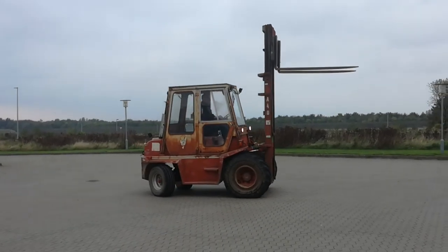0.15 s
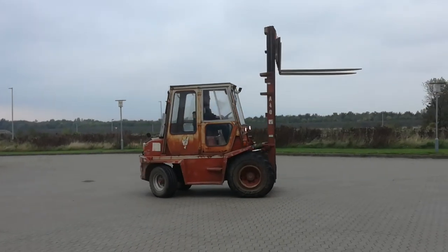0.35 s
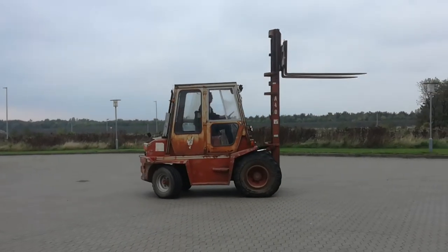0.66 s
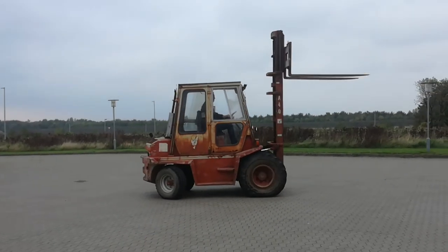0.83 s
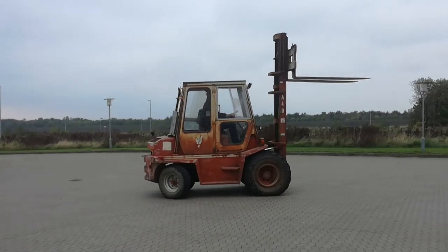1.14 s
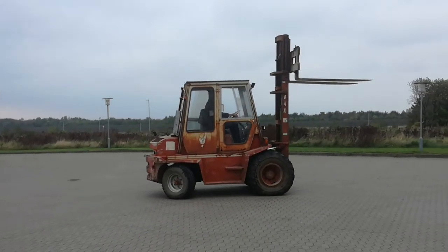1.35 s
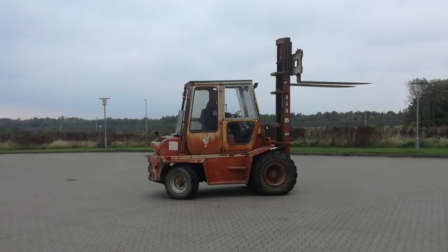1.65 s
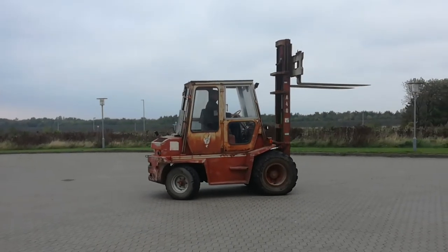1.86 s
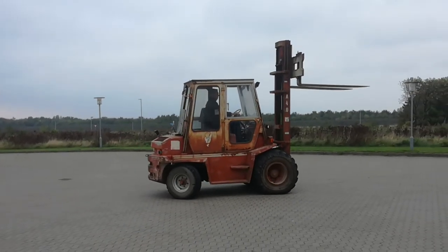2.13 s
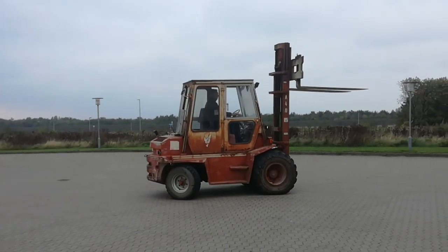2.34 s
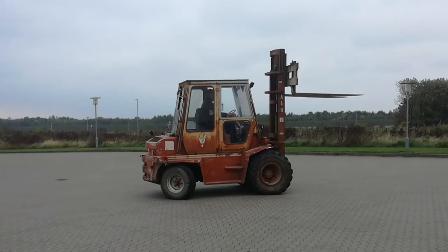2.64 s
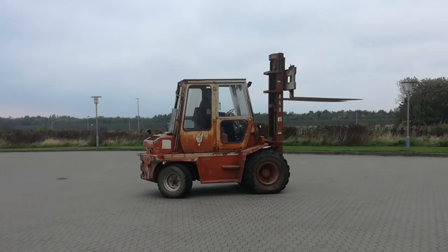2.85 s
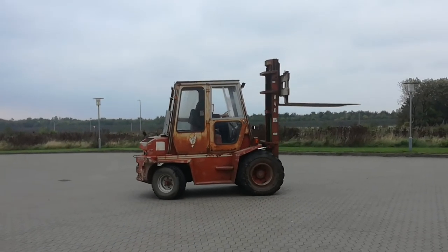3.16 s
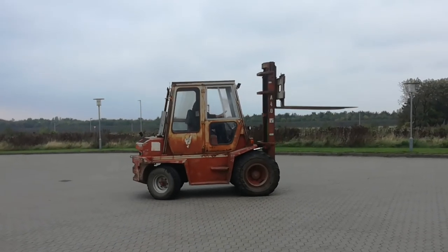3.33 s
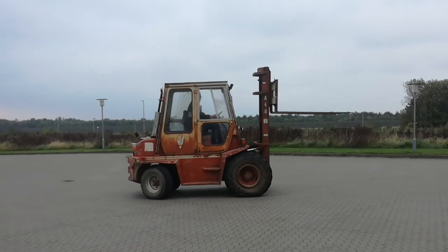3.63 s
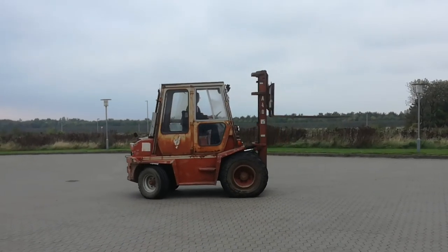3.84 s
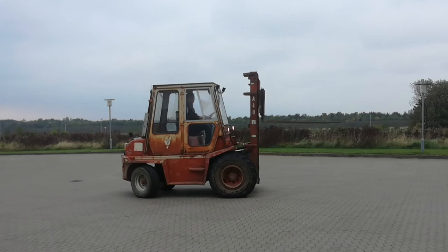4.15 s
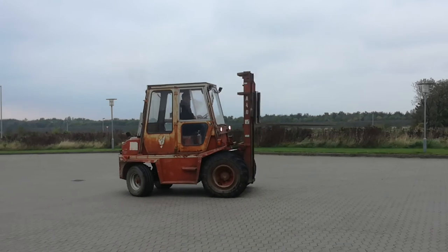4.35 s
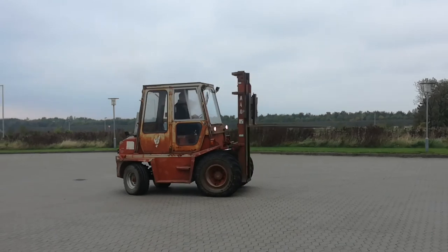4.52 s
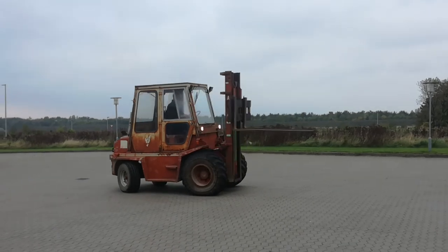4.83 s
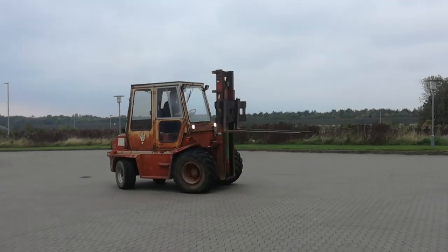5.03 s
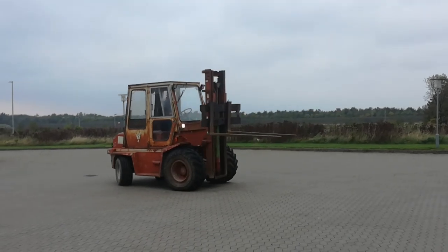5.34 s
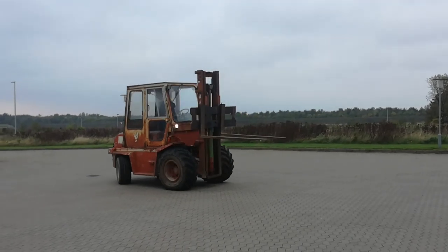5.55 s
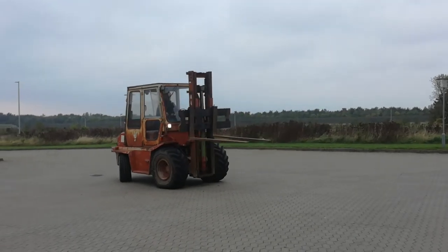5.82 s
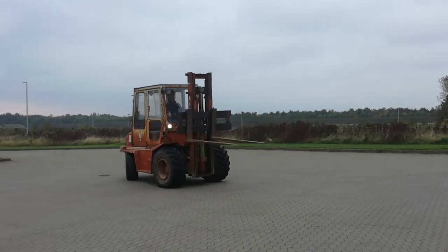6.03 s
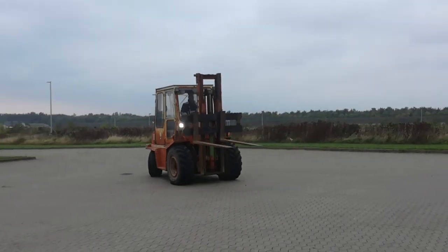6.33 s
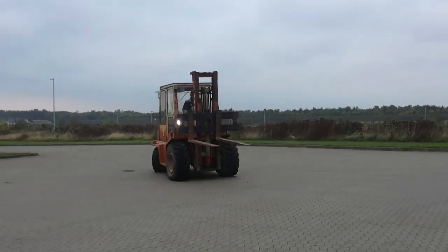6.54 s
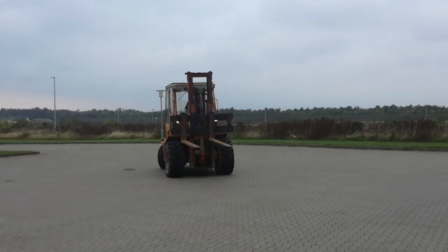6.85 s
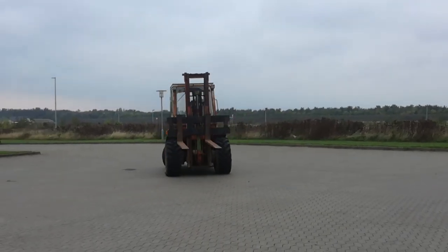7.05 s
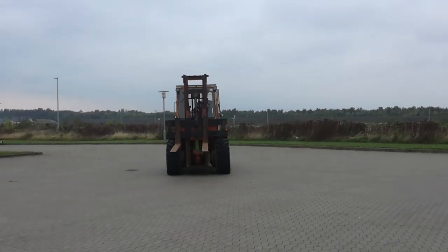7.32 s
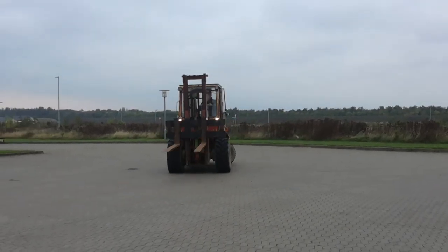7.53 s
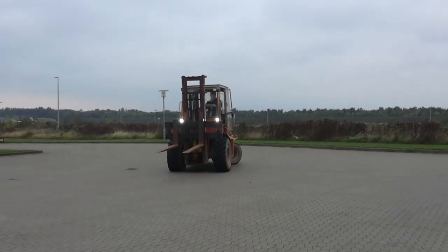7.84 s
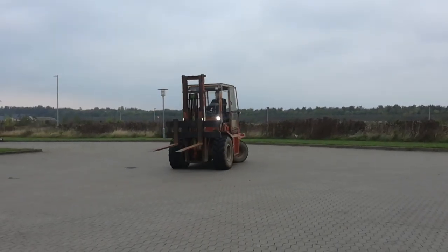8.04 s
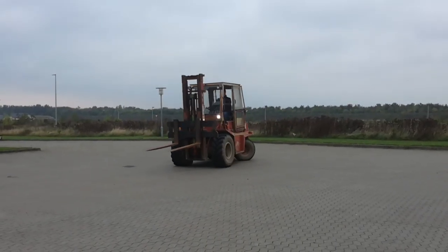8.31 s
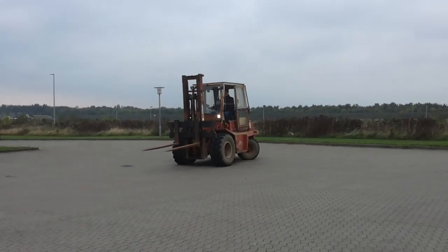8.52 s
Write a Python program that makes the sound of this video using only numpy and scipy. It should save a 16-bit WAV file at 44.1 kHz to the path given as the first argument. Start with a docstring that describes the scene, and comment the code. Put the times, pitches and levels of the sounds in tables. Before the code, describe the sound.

Steady knocking diesel idle in open air, heard in stereo from some metres away. Gritty hydraulic spurts and steel ticks over a faint pump whine give way to roaring, hissing oil through a valve, with a high squeal. After a sharp metallic clunk the engine lifts briefly, then settles while the machine turns, with faint tyre grit, a tiny squeak and low breeze rumble.

```python
"""A diesel forklift idles across an open paved lot, lowers its forks and turns to face the microphone.
Each firing gives an exhaust puff, as a stack of tones, and a knock in the block, as a noise burst.
The hydraulic pump whines at first, then fades to a trace; oil spurts in bursts of noise as the chain ticks.
Oil then rushes and squeals through the lowering valve, the mast clunks in decaying modes, and the engine
picks up. Grit hisses under the tyres and a light breeze rumbles behind it all."""
import sys
import numpy as np
from scipy import signal
from scipy.fft import rfft, irfft, next_fast_len
from scipy.io import wavfile
from scipy.ndimage import uniform_filter1d, map_coordinates

SR = 44100
rng = np.random.default_rng(int(sys.argv[2]) if len(sys.argv) > 2 else 0)


def generate_wav(signal):
    """Clip the signal to [-1, 1] and save it as 16-bit WAV at the path in sys.argv[1]."""
    frames = np.transpose(np.atleast_2d(signal))
    scaled = np.clip(frames, -1, 1) * 32767
    pcm = np.round(scaled).astype(np.int16)
    wavfile.write(sys.argv[1], SR, pcm)


N = 382769
TIME = np.arange(N) / SR

# Engine speed. Each row: time in seconds, firings per second.
ENGINE_SPEED = [(0.0, 31.222), (0.139, 30.44), (0.363, 32.273), (1.171, 31.002), (1.939, 30.967),
                (2.208, 28.326), (2.616, 30.415), (3.751, 31.212), (4.111, 37.107), (4.37, 35.153),
                (4.797, 35.429), (5.104, 33.867), (6.002, 32.395), (6.441, 32.724), (7.367, 32.638),
                (8.68, 33.744)]
# Strength of each cylinder's knock, in firing order, in dB.
CYLINDERS_DB = [2.2, 2.8, 3.0, 0]
# Spectrum of an oil spurt, which also colours the chain. Each row: frequency in Hz, level in dB.
SPURT_SPECTRUM = [(200, -24), (450, -6), (800, -3), (1100, 1), (1450, 0), (2000, -6), (2600, -15),
                  (3200, -11), (3800, -10.5), (4750, -7.5), (5600, -19.5), (8000, -22.5), (9000, -35),
                  (14000, -39), (15400, -34)]
# Resonances of the oil pipes. Each row: frequency in Hz, width in Hz, lift in dB.
PIPE_MODES = [(4050, 50, 6), (4222, 30, 3), (4425, 60, 3), (4680, 20, 6), (5012, 16, 6), (6501, 10, 4),
              (7830, 14, 5)]


def gain_of(db):
    """Decibels to gain."""
    return 10 ** (np.asarray(db) / 20)


def evened(x):
    """Scales to rms 1; a mid-side pair is scaled by its mid."""
    return x / np.sqrt(np.mean(np.atleast_2d(x)[0] ** 2) + 1e-20)


def follow(rows):
    """Draws straight lines through the rows, one curve per column, holding the end values."""
    s, *columns = np.transpose(rows)
    return [np.interp(TIME, s, c) for c in columns]


def colour(x, points):
    """Filters by a spectrum of (Hz, dB) points."""
    size = next_fast_len(N, True)
    hz, db = np.transpose(points)
    bins_hz = np.fft.rfftfreq(size, 1 / SR)
    gain = gain_of(np.interp(np.log(bins_hz + 1), np.log(hz), db))
    return irfft(rfft(x, size) * gain, size)[..., :N]


def add(mix, s, sound):
    """Adds a sound into the channels of mix at time s."""
    part = mix[:, max(round(s * SR), 0):][:, :sound.shape[-1]]
    part += sound[..., :part.shape[1]]


def wander(rate):
    """Random curve of rms 1 with `rate` knots per second; it holds still once 4096 knots are spent."""
    knots = rng.standard_normal(4096)
    return evened(np.interp(TIME * rate, np.arange(len(knots)), knots))


def crackle(spread_db, rate):
    """Mid and side noise whose strength wanders, within bounds, from instant to instant."""
    strength = gain_of(spread_db * np.tanh(wander(rate)))
    return evened(rng.standard_normal((2, N)) * strength)


def resonate(x, hz, width):
    """Shifts hz down to zero, smooths, and shifts back: a resonance of gain 1 that can move."""
    turn = np.exp(2j * np.pi * np.cumsum(hz * np.ones(N)) / SR)
    r = np.exp(-np.pi * abs(width) / SR)
    return 2 * (turn * signal.lfilter([1 - r], [1, -r], x / turn)).real


def ringing(x, modes):
    """Lifts narrow resonances out of a sound, from rows of (Hz, width Hz, dB)."""
    lifts = [(gain_of(db) - 1) * signal.lfilter(*signal.iirpeak(hz, hz / width, SR), x)
             for hz, width, db in modes]
    return x + sum(lifts)


def churn(x, depth_db, patch_hz=260, patch_s=.035):
    """Patches of the spectrum swell and sink at random."""
    hz, s, z = signal.stft(x, SR, nperseg=512, noverlap=384)
    field = rng.standard_normal((256, 512))
    where = np.meshgrid(hz / patch_hz, s / patch_s, indexing="ij")
    patches = map_coordinates(field, where, order=1, mode="wrap")
    churned = signal.istft(z * gain_of(depth_db * patches), SR, nperseg=512, noverlap=384)[1]
    return evened(churned[:, :N])


def steel(x, t60, share):
    """The treble also passes through steelwork with dense, short-lived modes."""
    t = np.arange(4096) / SR
    ring = rng.standard_normal((2, len(t))) * 1000 ** (-t / t60)
    ring /= np.linalg.norm(ring, axis=1, keepdims=True)
    ring = signal.sosfilt(signal.butter(2, 2200, "high", fs=SR, output="sos"), ring)
    return evened(x + share * signal.oaconvolve(x, ring, axes=1)[:, :N])


def spread(mid, side):
    """The side is part phase shift between the ports, part scattered sound; each port favours its own bands."""
    # Between the two microphone ports. Each row: frequency in Hz, side against mid in dB,
    # share of the side that is a quarter cycle ahead, -1 to 1.
    port_width = [(60, -15, 0.21), (140, -16.5, -0.45), (260, -12, -0.18), (388, 1.5, -0.96),
                  (604, -9.5, -0.55), (890, 5, -0.57), (1120, -9, 1), (1340, -4, -0.7), (1620, -3, 0.42),
                  (1850, -8, 0.52), (2280, 0, 0.29), (2920, 2.5, -0.38), (4700, -0.5, -0.77),
                  (15000, 0, -0.077)]
    # Lean of the microphone. Each row: frequency in Hz, left against right in dB.
    port_lean = [(200, 0), (320, .5), (480, -2.5), (690, 3), (960, -5), (1450, 2.5), (1640, -1), (2000, 8),
                 (2400, 8.5), (3200, -3.5), (4200, -2), (5600, -7.5), (6700, -4.5), (8000, -9), (13500, 5),
                 (15500, 3)]
    size = next_fast_len(N, True)
    hz, db, ahead = np.transpose(port_width)
    bins_hz = np.fft.rfftfreq(size, 1 / SR)
    ahead = np.clip(np.interp(np.log(bins_hz + 1), np.log(hz), ahead), -1, 1)
    shifted = 1j * ahead * rfft(mid, size)
    scattered = np.sqrt(1 - ahead ** 2) * rfft(side, size)
    side = colour(irfft(shifted + scattered, size)[:N], np.transpose([hz, db]))
    # the two ports' powers add up to the same total in every band
    left, right = [[(f, 10 * np.log10(2 / (1 + gain_of(-sign * lean) ** 2))) for f, lean in port_lean]
                   for sign in (1, -1)]
    return np.array([colour(mid + side, left), colour(mid - side, right)])


def placed(pair, left_db):
    """Leans a left-right pair to one side: left against right in dB."""
    return pair * gain_of([[left_db / 2], [-left_db / 2]])


def air(gust_db=3):
    """A light breeze rumbles under faint open-air hiss, as coloured noise with slow gusts."""
    # Breeze and distance. Each row: frequency in Hz, relative level in dB per Hz.
    air_spectrum = [(15, -51), (35, 4.5), (70, 6.5), (100, 2), (150, 0), (400, -11.5), (2000, -5.5),
                    (8000, -44.5), (15000, -40)]
    # Strength of the breeze before gusts. Each row: time in seconds, level in dB.
    breeze = [(0, -45.5), (2, -46), (4.5, -43), (6.2, -44.5), (7.2, -47.5), (8.68, -45.5)]
    gusts = gust_db * np.tanh(wander(3.08))
    return evened(colour(rng.standard_normal((2, N)), air_spectrum)) * gain_of(follow(breeze)[0] + gusts)


def squeak(width_hz=1000):
    """A brief squeak that sags in pitch: a tone made fuzzy by low-passed noise."""
    # Each row: time in seconds, frequency in Hz, level in dB.
    squeak_path = [(7.806, 5040, -50), (7.82, 4720, -40), (7.832, 4300, -45), (7.85, 4140, -49)]
    hz, db = follow(squeak_path)
    lowpass = signal.butter(2, width_hz, fs=SR, output="sos")
    fuzz = evened(signal.sosfilt(lowpass, rng.standard_normal((2, N))))
    sounding = (TIME > squeak_path[0][0]) & (TIME < squeak_path[-1][0])
    return np.sqrt(2) * sounding * gain_of(db) * fuzz * np.cos(2 * np.pi * np.cumsum(hz) / SR)


def tyres(spread_db=7):
    """Grit hisses under the turning tyres as uneven noise; a few grains crack as sudden swells of it."""
    # Tyres scrubbing grit on the pavers in the turn. Each row: time in seconds, level in dB.
    scrub = [(3.6, -72), (4.5, -60.5), (6.6, -57), (7.1, -62.5), (8.68, -64.5)]
    # Spectrum of the grit. Each row: frequency in Hz, relative level in dB per Hz.
    grit = [(1500, -32), (3000, -3), (5500, -2), (6700, -13), (8000, -3.5), (9500, -18.5), (14000, -16.5)]
    # Single grains that crack under a tyre. Each row: start in seconds, level in dB added to the scrub.
    cracks = [(4.55, -52), (6.82, -50.5), (7.16, -56)]
    level = gain_of(follow(scrub)[0])
    decay = np.exp(-np.arange(2000) / SR / 0.0086)
    for s, db in cracks:
        add(level[None], s, gain_of(db) * decay)
    return level * evened(colour(crackle(spread_db, rate=410), grit))


def thuds(half_cycles=0.55):
    """The machine rocks on its tyres, which take the weight with a few low swings under a bell envelope."""
    # Each row: middle in seconds, level in dB, frequency in Hz.
    thud_rows = [(1.003, -32, 75), (5.22, -41, 31.9), (5.56, -35, 73), (5.875, -36, 47.7)]
    out = np.zeros(N)
    for s, db, hz in thud_rows:
        cycles = (TIME - s) * hz
        bell = np.exp(-(cycles / half_cycles) ** 2)
        out += np.sqrt(2) * gain_of(db) * bell * np.cos(2 * np.pi * cycles)
    return out


def clunks(rattle=0.54):
    """Blows, then rattling contacts, ring the mast; soft blows reach its low modes, hard ones the high."""
    # Clunks of mast and carriage. Each row: start in seconds, loudest short-term level in dB,
    # contact time in seconds, brightness in Hz.
    blows = [(.970, -34, .003, 210), (.986, -32.5, .003, 190), (1.37, -42, .02, 160),
             (2.256, -28, .005, 560), (2.277, -28, .005, 140), (2.308, -33, .007, 170),
             (2.385, -36, .012, 180), (2.42, -34, .014, 180), (3.807, -28.5, .005, 2400),
             (3.815, -23, .004, 800), (3.843, -32.5, .008, 360), (3.876, -34, .007, 190),
             (3.903, -35, .006, 1300), (3.952, -40, .012, 500), (4.44, -39, .014, 170),
             (4.857, -38, .006, 2400)]
    # What the mast rings with. Each row: frequency in Hz, level in dB, 60 dB decay time in seconds.
    mast_modes = [(118, 0, .13), (165, 2, .14), (225, 0, .13), (285, -1, .13), (335, -4, .1), (462, 1, .08),
                  (518, 6, .08), (640, -4, .05), (800, 3, .04), (930, -1, .03), (1250, 7, .03),
                  (1400, 4, .03), (1780, 9, .04), (2300, 6, .025)]
    out, t = np.zeros((2, N)), np.arange(12000) / SR
    for s, db, contact, bright_hz in blows:
        lowest_hz = bright_hz / 3
        ring = np.zeros((2, len(t)))
        for hz, mode_db, t60 in mast_modes:
            reach = (1 + (hz / bright_hz) ** 4 + (lowest_hz / hz) ** 4) ** .5
            swing = np.sin(2 * np.pi * (hz * t + rng.random((2, 1))))
            ring += gain_of(mode_db) * 1000 ** (-t / t60) * swing / reach
        ring = ring * np.minimum(t / .001, 1)
        solid = evened(ring * (1 - np.exp(-t / contact)))
        contacts = rng.standard_normal((2, len(t))) * (t / contact) * np.exp(-t / contact)
        rattling = evened(signal.fftconvolve(contacts, ring, axes=1)[:, :len(t)])
        sound = solid + rattle * rattling
        loudest = np.sqrt(uniform_filter1d(sound ** 2, size=900).max(axis=1, keepdims=True))
        add(out, s, gain_of(db) * sound / loudest)
    return out


def ticks(level_db=3, tail_db=-6, tail_s=.008):
    """Each chain link lands with a crack and a short, dense steel ring, a little brighter than the spurts."""
    # Lift chain against the mast. Each row: start in seconds, level in dB before level_db is added.
    tick_rows = [(0.0423, -39), (0.0687, -31), (0.2423, -27), (0.2844, -32), (0.3731, -25), (0.4623, -26),
                 (0.5357, -27), (0.5574, -27), (0.6544, -23), (0.7497, -26), (0.7816, -31), (0.8704, -26),
                 (0.9014, -22), (0.9517, -21), (1.0241, -27), (1.1333, -33), (1.6357, -30), (3.1198, -20),
                 (3.465, -26), (3.6426, -21)]
    out, t = np.zeros((2, N)), np.arange(3000) / SR
    crack_s = .0015
    shape = np.exp(-t / crack_s) + gain_of(tail_db) * np.exp(-t / tail_s)
    for s, db in tick_rows:
        add(out, s, gain_of(db + level_db) * shape * rng.standard_normal((2, len(t))))
    brighter = colour(colour(out, SPURT_SPECTRUM), [(1200, -1.5), (9000, 4)])
    return ringing(brighter, PIPE_MODES)


def spurts(rise=0.0025, level_db=-1.8, ring_share=1.0):
    """Oil spurts as the valve is feathered: short gritty bursts of noise that ring the pipes."""
    # Each row: start in seconds, length in seconds, level in dB before level_db is added.
    spurt_rows = [(0, 0.015, -29), (0.034, 0.052, -31.5), (0.24, 0.11, -31), (0.361, 0.023, -36),
                  (0.46, 0.021, -31.5), (0.534, 0.042, -28.5), (0.59, 0.083, -34.5), (0.642, 0.036, -37.5),
                  (0.691, 0.025, -32), (0.739, 0.026, -34), (0.78, 0.022, -34.5), (0.865, 0.011, -31.5),
                  (0.892, 0.036, -31.5), (0.938, 0.023, -31), (1.012, 0.076, -35.5), (1.113, 0.035, -34.5),
                  (1.628, 0.03, -31), (3.383, 0.018, -32), (3.448, 0.042, -31), (3.565, 0.12, -32.5),
                  (3.71, 0.049, -36), (3.79, 0.025, -38)]
    fall = .008  # seconds
    opening, t = np.zeros(N), np.arange(8192) / SR
    for s, length, db in spurt_rows:
        shape = (1 - np.exp(-t / rise)) * np.exp(-np.maximum(t - length, 0) / fall)
        add(opening[None], s, gain_of(db) * shape)
    jet = steel(crackle(spread_db=6, rate=1300), t60=.05, share=1.3)
    pipes = [(hz, width, db * ring_share) for hz, width, db in PIPE_MODES]
    return gain_of(level_db) * opening * evened(ringing(colour(jet, SPURT_SPECTRUM), pipes))


def squeal(turns, throb_db=4.0, bend_hz=22):
    """The valve squeals as the flow settles: a narrow band of noise that throbs and bends with each firing."""
    # Each row: time in seconds, frequency in Hz before bending, level in dB before trim and throb.
    squeal_path = [(2.6, 4330, -56), (2.74, 4370, -38), (2.98, 4430, -36.5), (3.24, 4510, -36),
                   (3.33, 4470, -40), (3.42, 4450, -60)]
    hz, db = follow(squeal_path)
    hz = hz + bend_hz * np.sin(2 * np.pi * turns) + bend_hz * wander(40)
    width = 170  # Hz
    tone = evened(resonate(resonate(rng.standard_normal((2, N)), hz, width), hz, 2 * width))
    sounding = (TIME > squeal_path[0][0]) & (TIME < squeal_path[-1][0])
    return sounding * tone * gain_of(db - 2.0 + throb_db * np.cos(2 * np.pi * turns))


def lowering(edge=0.015, flicker_db=2.0):
    """Turbulent oil roars through the mast, whistles in the pipes and hisses while the flow is fastest."""
    # Oil flow while the forks sink. Each row: time in seconds, flow in dB near its peak's 0,
    # pitch of the jet in the valve in Hz.
    oil_flow = [(2.179, -9, 4440), (2.33, -7.5, 4350), (2.42, -1, 4500), (2.51, 0.5, 4600), (2.6, -6, 4500),
                (2.76, -7.5, 4170), (2.999, -10.5, 4300), (3.27, -9.5, 4330), (3.43, -18.5, 4160),
                (3.78, -26, 4300)]
    # Spectra of the roar and of the hiss. Each row: frequency in Hz, relative level in dB per Hz.
    roar_spectrum = [(82, -42), (140, -23), (167, -2.5), (210, -28.5), (342, -2.5), (407, -9.5), (484, 2.5),
                     (590, -5.5), (760, -4.5), (907, -2.5), (1120, 2), (1450, 2), (1600, -6), (1860, 2.5),
                     (2190, -8), (2700, -11.5), (3400, -16), (4420, -12), (7480, -120)]
    hiss_spectrum = [(2000, 8.5), (3200, 8.5), (4300, 11), (5200, 14), (5900, 3), (6500, 9), (7200, 1.5),
                     (7900, 5.5), (8800, -17), (11000, -9), (14000, -19), (15400, -14)]
    roar_db, whistle_db, hiss_db = -28.5, -32.5, -32.5  # at flow 0 dB, before body and flicker
    roar_law, whistle_law = 0.37, 0.5  # dB per dB of flow; the hiss follows it one to one
    choke_db, choke_law = -6, 0.23  # below this flow the whistle dies away faster, by this many dB per dB
    body_hz, body_db, body_db_per_s = 850, -1, 6.5  # the low part of the roar swells as the carriage sinks
    hollow_hz, hollow_hz_per_s = 1010, 190  # a resonance of the mast climbs as it shortens
    hollow_width_hz, hollow_db = 110, -11
    shut_s = 0.1  # the flow dies away at the end of travel
    start, end = oil_flow[0][0], oil_flow[-1][0]
    flow, jet_hz = follow(oil_flow)
    sinking_s = np.clip(TIME, start, end) - start

    jet = steel(crackle(spread_db=1.0, rate=450), t60=0.031, share=1.0)
    swirl, width = crackle(spread_db=2.5, rate=130), 520  # width in Hz
    whistle = resonate(resonate(swirl, jet_hz, width), jet_hz, width)
    whistle = evened(ringing(whistle, PIPE_MODES))
    choke = choke_law * np.maximum(choke_db - flow, 0)

    roar = churn(colour(jet, roar_spectrum), depth_db=2.8)
    body = colour(roar, [(body_hz, 0), (2 * body_hz, -40)])
    hollow = evened(resonate(roar, hollow_hz + hollow_hz_per_s * sinking_s, hollow_width_hz))
    swell = gain_of(body_db + body_db_per_s * sinking_s) - 1
    roar = evened(roar + gain_of(hollow_db) * hollow) + swell * body
    hiss = evened(ringing(colour(jet, hiss_spectrum), PIPE_MODES))

    layers = (gain_of(roar_db + roar_law * flow) * roar
              + gain_of(whistle_db + whistle_law * flow - choke) * whistle
              + gain_of(hiss_db + flow) * hiss)
    gate = np.clip((TIME - start) / edge, 0, 1) * np.exp(-np.maximum(TIME - end, 0) / shut_s)
    return gate * gain_of(flicker_db * wander(70)) * layers


def whine(turns):
    """The pump's gears sing one thin tone; each firing jolts the shaft a little."""
    # Each row: time in seconds, frequency in Hz before the jolts, level in dB before wavering.
    whine_path = [(0, 1853, -42), (.22, 1767, -51), (.33, 1876, -46), (.62, 1953, -47), (.85, 2006, -52),
                  (.89, 1943, -38), (1.02, 1970, -55), (1.14, 1910, -42), (1.42, 1918, -39),
                  (1.58, 1936, -41), (1.8, 1906, -46), (1.95, 1906, -44.5), (2.05, 1887, -48),
                  (2.3, 1820, -65)]
    flutter, backlash, waver_db = .35, .25, 1.6  # flutter and backlash in radians
    hz, db = follow(whine_path)
    jolts = flutter * np.sin(2 * np.pi * turns) + backlash * wander(30)
    angle = 2 * np.pi * np.cumsum(hz) / SR + jolts
    return np.sqrt(2) * np.cos(angle) * gain_of(db + waver_db * wander(43.45))


def bracket(turns, hz=3060, width=90):
    """A loose bracket sings: each firing shakes a thin ringing part with a burst of noise."""
    # Each row: time in seconds, level in dB.
    bracket_level = [(4.3, -70), (5.2, -59), (6.4, -56), (6.9, -60.5), (7.3, -62), (7.7, -62), (8.68, -63)]
    shakes = np.exp(-(turns % 1) / 2.0) * rng.standard_normal((2, N))
    sung = resonate(resonate(shakes, hz, width), hz, 3 * width)
    return gain_of(follow(bracket_level)[0]) * evened(sung)


def block(turns):
    """Each firing rings the engine block for a few milliseconds, at a slightly different pitch each time."""
    # Each row: time in seconds, level in dB.
    block_level = [(0, -50), (3.9, -50), (4.5, -47), (6.8, -47), (7.15, -42.5), (7.4, -42), (7.7, -47),
                   (8.68, -50)]
    hz, scatter_hz, scatter_db = 1290, 70, 2
    peaks, length = .52, .14  # in parts of a firing
    firing = turns.astype(int)
    pitch, size = rng.standard_normal((2, firing[-1] + 1))[:, firing]
    strength_db = np.take(CYLINDERS_DB, firing % len(CYLINDERS_DB)) + scatter_db * np.tanh(size)
    stroke = gain_of(strength_db) * np.exp(-((turns % 1 - peaks) / length) ** 2 / 2)
    angle = 2 * np.pi * np.cumsum(hz + scatter_hz * np.tanh(pitch)) / SR
    return gain_of(follow(block_level)[0]) * evened(stroke * np.cos(angle))


def knock(noise, shape):
    """A burst of the given shape that strikes all frequencies about equally hard."""
    flat = irfft(np.exp(1j * np.angle(rfft(noise * shape))))
    return evened(flat * np.minimum(4 * shape / shape.max(), 1))


def clatter(turns, fires=.39, scatter_db=3.1):
    """Every cylinder has its own knock, partly new each time, over the rattle of valves and gears."""
    # Combustion clatter at steady speed. Each row: time in seconds, level in dB.
    clatter_level = [(0, -34), (1.35, -38.5), (2.05, -37.5), (2.3, -30.5), (3.7, -34.5), (4.8, -38),
                     (6.8, -39.5), (7.3, -38), (8.1, -41), (8.68, -41.5)]
    # How the machine faces the microphone. Each row: time in seconds, 0 flank, 1 oblique or 2 front.
    facing_path = [(0, 0.46), (1.2, 0.78), (2.2, 0.23), (4.1, 0.93), (5.6, 1.52), (6.7, 1.88), (8.68, 1.9)]
    # The clatter as it radiates each way. Each row: frequency in Hz, relative level in dB per Hz.
    flank = [(130, 16.5), (220, -41), (400, -31), (650, 0), (880, 1.5), (1150, 4), (1400, 15.5), (1520, -3),
             (1800, 6), (2150, -3.5), (4500, -12.5), (5700, -7.5), (6600, -20), (15000, -38)]
    oblique = [(130, 9), (300, -7), (420, -8.5), (690, 1), (880, -9), (1120, 0), (1380, -1.5), (1500, -7),
               (1780, -0.5), (2450, -4.5), (2800, -10), (3100, -5), (3500, -10), (5300, -17), (9000, -31.5),
               (15000, -39)]
    front = [(130, 6.5), (430, -9.5), (690, 10.5), (870, -9), (1100, 4.5), (1360, 4.5), (1490, -4),
             (1800, -1.5), (2300, 1.5), (2750, -18), (3700, -25), (5200, -13.5), (6800, -25.5),
             (9500, -34.5), (15000, -33)]
    # Panels that the engine sets ringing. Each row: frequency in Hz, width in Hz, lift in dB.
    panels = [(338, 19, 7), (419, 5.5, 12.5), (671, 18, 3), (1021, 17, 6.5), (1124.6, 26, 8.5),
              (1799, 137, 9.5), (3030, 70, 3), (4280, 370, 5), (4960, 220, 2.5)]
    # Each row: frequency in Hz, knock against rattle in dB.
    knock_share = [(150, 1), (400, -4), (700, 1), (1000, 2), (1300, 5), (1700, -1), (2500, 0), (5000, -4),
                   (12000, -7)]
    pull_db = 0.1131  # harder knock while speeding up, dB for each firing per second gained in a second
    rise, decay, fresh = .005, .013, .7  # seconds, seconds, new noise against the cylinder's own

    t = np.arange(2048) / SR
    shape = (1 - np.exp(-t / rise)) * np.exp(-t / decay)
    own = rng.standard_normal((len(CYLINDERS_DB), 2, len(t)))
    rattle = crackle(spread_db=3, rate=420)
    knocks = np.zeros((2, N))
    draws, sizes = rng.standard_normal((320, 2, len(t))), rng.standard_normal(320)
    for k, at in enumerate(np.flatnonzero(np.diff(np.floor(turns - fires)))):
        cylinder = k % len(own)
        strength = gain_of(CYLINDERS_DB[cylinder] + scatter_db * np.tanh(sizes[k]))
        add(knocks, at / SR, strength * knock(own[cylinder] + fresh * draws[k], shape))

    # knock and rattle share each band by the table; together they stay about white
    drive = colour(evened(knocks), knock_share) + rattle
    drive = colour(drive, [(hz, -10 * np.log10(gain_of(db) ** 2 + 1)) for hz, db in knock_share])
    drive = signal.sosfilt(signal.butter(4, 150, "high", fs=SR, output="sos"), drive)
    drive = churn(ringing(drive, panels), depth_db=2.05)

    facing = np.clip(follow(facing_path)[0], 0, 2)
    radiated = np.zeros((2, N))
    for k, way in enumerate([flank, oblique, front]):
        radiated += np.maximum(1 - abs(facing - k), 0) * evened(colour(drive, way))
    speeding_up = np.maximum(np.gradient(follow(ENGINE_SPEED)[0]) * SR, 0)
    pull = uniform_filter1d(speeding_up, size=6000)
    return radiated * gain_of(follow(clatter_level)[0] + pull_db * pull)


def exhaust(turns, opens=0.835, uneven_db=0.72, chug_db=6):
    """One puff per firing, as a stack of orders; unequal cylinders give the half orders."""
    # Exhaust boom before trim and unevenness. Each row: time in seconds, then the levels in dB
    # at two, three and four times the firing rate.
    boom = [(0, -36, -35.5, -46), (.28, -44.5, -36, -50), (.46, -44, -40.5, -46.5),
            (.95, -40.5, -43.5, -46), (2.05, -41.5, -43.5, -48.5), (2.18, -44, -37, -52),
            (2.44, -36, -35, -55), (2.62, -39, -41, -46), (3.85, -40.5, -39, -48),
            (4.13, -32.5, -38.5, -64), (4.4, -39, -43.5, -43.5), (5.1, -38.5, -40, -47.5),
            (5.55, -50, -34, -49), (5.88, -42, -39.5, -50), (6.5, -44, -37, -52.5),
            (7.4, -42, -36.5, -43.5), (8.15, -38, -38, -45.5), (8.68, -37, -40, -44.5)]
    # The weaker orders. Each row: multiple of the firing rate, level in dB against the boom.
    weak_orders = [(1, -15.5), (1.5, -28), (2.5, -30), (3.5, -29), (4.5, -26), (5, -19), (5.5, -18.5),
                   (6, -22), (7, -17), (8, -26), (9, -27), (12, -21)]
    second_db, third_db, fourth_db = follow(boom)
    boom_db = (second_db + third_db) / 2
    revving = np.clip(follow(ENGINE_SPEED)[0] - 33.6, 0, 1.8)  # firings per second above idle
    orders = [(2, second_db), (3, third_db), (4, fourth_db)]
    for k, db in weak_orders:
        swell_db = chug_db * revving if k == 1 else 0  # above idle the fundamental swells
        orders.append((k, boom_db + db + swell_db))
    jitter = .0065  # in firings
    angle = 2 * np.pi * (turns - opens + jitter * wander(25))
    lag = .25  # the pipe delays the higher orders, so each puff rings on
    puffs = -sum(gain_of(db) * np.cos(k * angle - lag * (k - 2.5) ** 2) for k, db in orders)
    return np.sqrt(2) * puffs * gain_of(-0.5 + uneven_db * wander(35))


def scene():
    """Sums the sources as mid and side, then spreads them: the engine a little left, the mast a little right."""
    turns = np.cumsum(follow(ENGINE_SPEED)[0]) / SR + 0.04102  # counts firings
    mid, side = clatter(turns) + bracket(turns) + tyres() + squeak()
    engine = spread(mid + whine(turns) + block(turns), side)
    mast = spread(*(spurts() + lowering() + squeal(turns) + ticks() + clunks()))
    mid, side = air()
    low_and_air = spread(mid + exhaust(turns) + thuds(), side)
    return placed(engine, left_db=0.5) + placed(mast, left_db=-0.3) + low_and_air


def record(dry):
    """The recorder's band limit: a steep low-pass."""
    edge_hz = 15850
    lowpass = signal.firwin(511, edge_hz, window=("kaiser", 9), fs=SR)
    return signal.oaconvolve(dry, lowpass[None], "same")


dry = scene()
out = record(dry)
generate_wav(out)
```